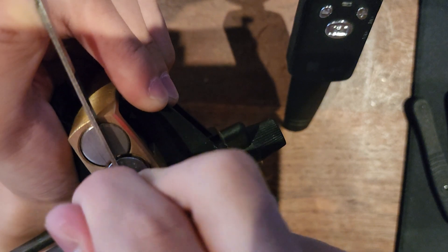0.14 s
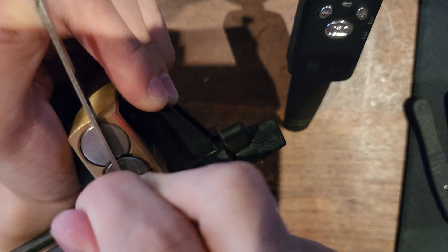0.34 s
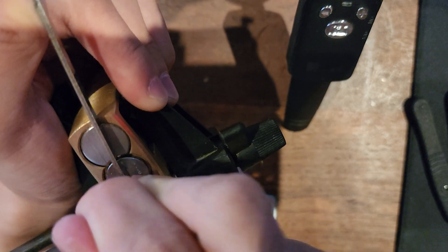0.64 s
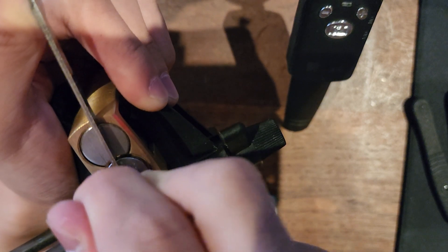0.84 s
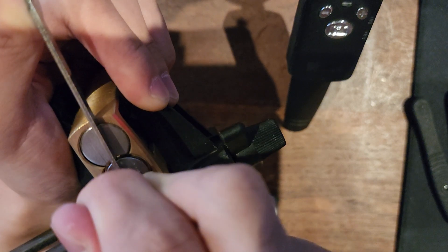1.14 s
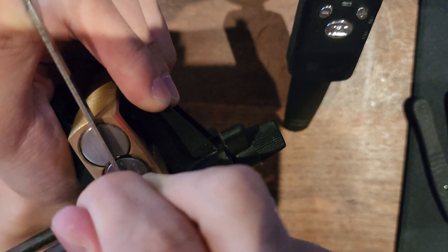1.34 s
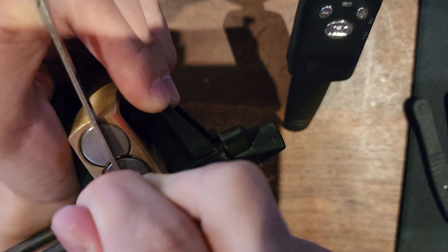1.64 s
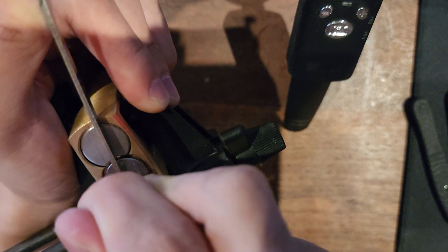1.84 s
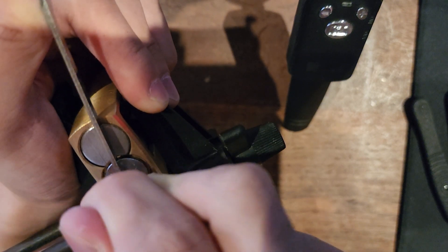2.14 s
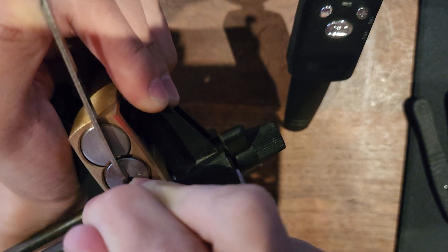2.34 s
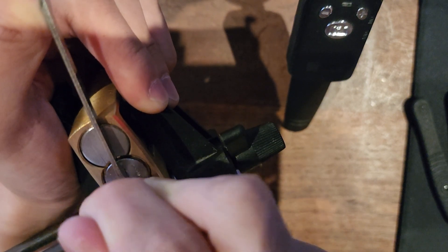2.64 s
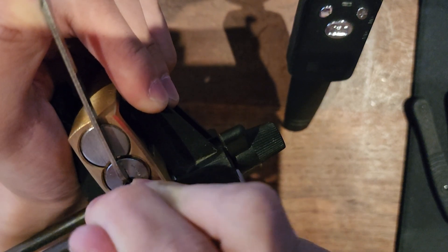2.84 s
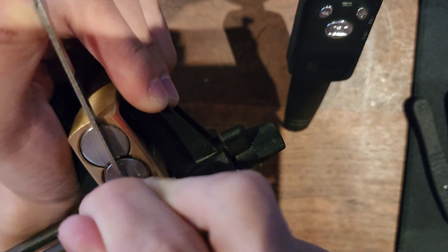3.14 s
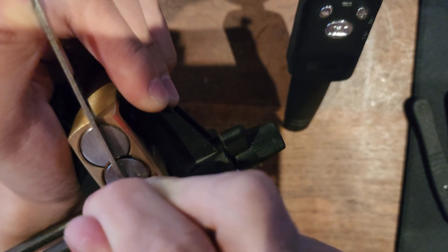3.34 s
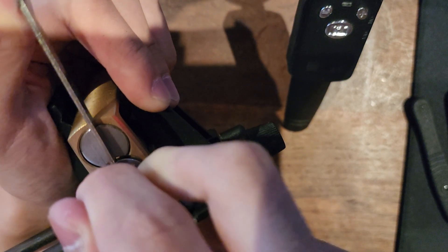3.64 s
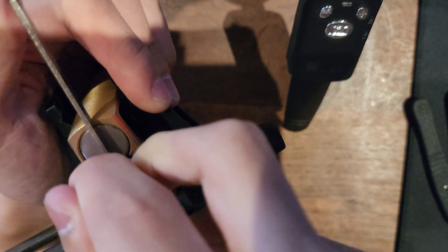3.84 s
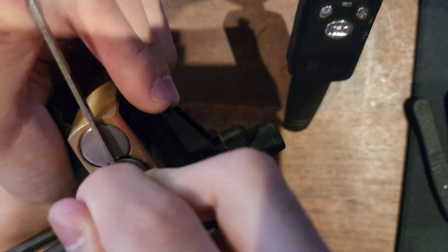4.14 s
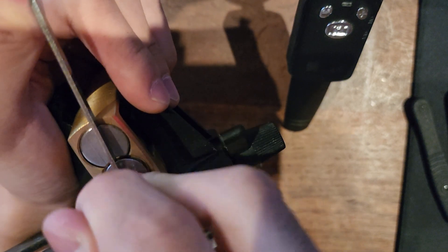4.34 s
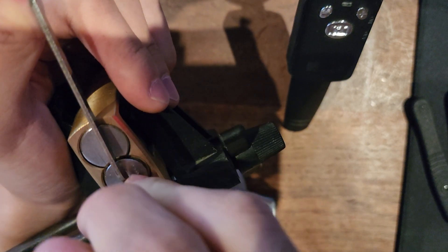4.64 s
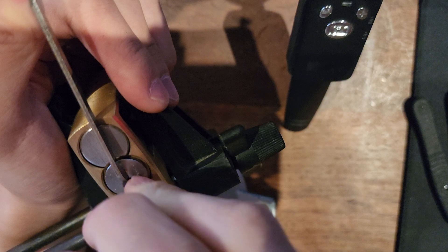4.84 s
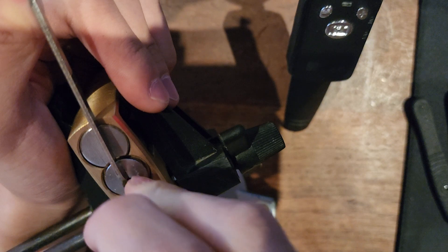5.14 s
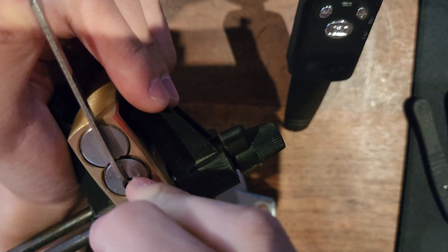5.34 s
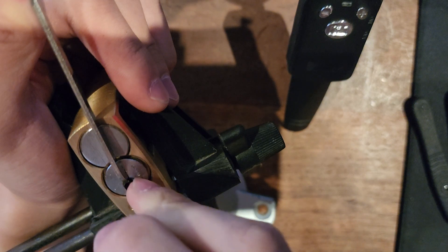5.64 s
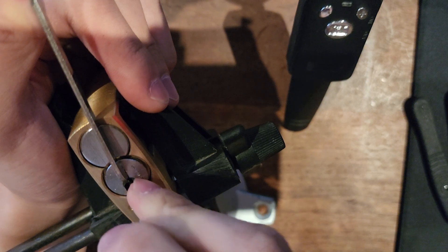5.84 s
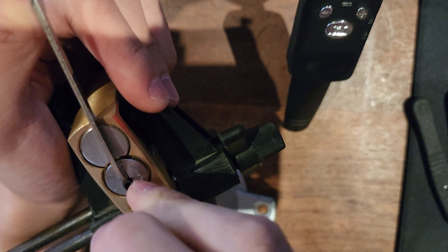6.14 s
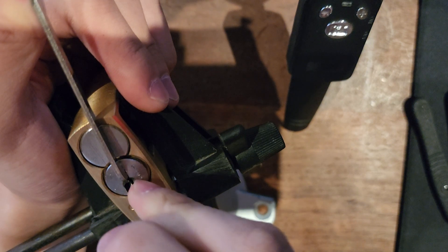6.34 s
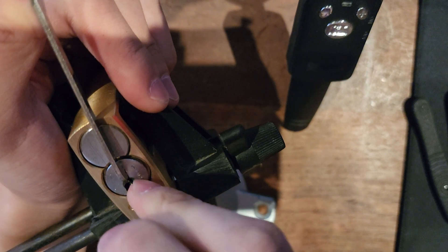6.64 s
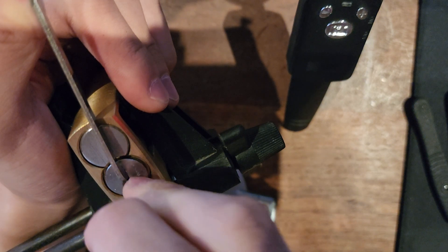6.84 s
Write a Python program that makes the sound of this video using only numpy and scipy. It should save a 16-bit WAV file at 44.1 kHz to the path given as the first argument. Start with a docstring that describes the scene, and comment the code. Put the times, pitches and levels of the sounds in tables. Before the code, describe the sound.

A thin pick clicks and slips against pins inside a clamped metal lock, with sharp snaps and bench thumps over a steady low hum.

```python
"""A pick works a lock held in a vise, near a two-port microphone; appliance hum and air noise throughout.
0.9 s: faint tick. 1.4-1.8 s: hard slips, bench thumps, a short twang. 2.4 s: the hardest slip.
2.6-3.5 s: faint slips, a scrape. 3.6 s: a faint treble hiss swells before a hard cluster, then a pick buzz.
3.8-5.6 s: faint slips and scrapes. 6.0 s: two firmer slips with thumps, then faint ticks to 6.8 s.
Slips are bursts of grit ringing lock modes; jolts ring bench modes; a small room answers with noise tails."""
import sys
import numpy as np
from scipy import signal
from scipy.fft import rfft, irfft, next_fast_len
from scipy.io import wavfile
from scipy.ndimage import uniform_filter1d

SR = 44100
rng = np.random.default_rng(int(sys.argv[2]) if len(sys.argv) > 2 else 0)


def wav_record(signal):
    """Record a signal, one row per channel, as 16-bit PCM in the file named by sys.argv[1]."""
    frames = np.transpose(np.atleast_2d(signal))
    bounded = np.clip(frames, -1, 1)
    # unit amplitude maps onto the largest positive 16-bit level
    quanta = np.round(bounded * 32767).astype(np.int16)
    wavfile.write(sys.argv[1], SR, quanta)


N = 307862

# Motor and mains tones. Each row: frequency in Hz, level in dB rms, waver in dB.
HUM_TONES = [(34, -68, 1), (68.8, -64.5, 1), (119.8, -49, 1.0), (229.8, -60, 2)]
# Air noise spectrum. Each row: frequency in Hz, relative density in dB per Hz.
AIR_SPECTRUM = [(25, -27.5), (50, -12), (80, -9), (100, -3.5), (150, -2.5), (200, -1.5), (290, -2),
                (380, -10.5), (600, -17.5), (1000, -22), (2000, -29), (4000, -45), (8000, -50.5),
                (9200, -57.5)]
# Air noise resonances. Each row: frequency in Hz, width in Hz, boost in dB.
AIR_RESONANCES = [(152.9, 33, 4), (279, 14, 3.5), (322.7, 29, 1), (549, 8.5, 8), (604, 42, 7.5),
                  (913, 180, 5), (1320, 220, 6), (1715, 100, 5.5), (2140, 250, 4.5), (3440, 1000, 6.5),
                  (5640, 300, 5.5), (8000, 1300, 4)]
# Air noise at the two ports. Each row: frequency in Hz, left-right correlation before clipping to +-0.99.
AIR_LIKENESS = [(60, 0.98), (130, 1), (290, 0.54), (640, -0.026), (1410, -0.28), (3100, 0.11),
                (6820, -0.13), (15000, -0.29)]
# Room echoes. Each row: frequency in Hz, level in dB, t60 in seconds.
ROOM_BANDS = [(490, -59, 0.36), (1970, -48.5, 0.41), (4884, -45, 0.27), (10000, -43, 0.31),
              (13500, -40.5, 0.13), (15900, -42, 0.13)]
# Bench and vise modes. Each row: frequency in Hz, relative level in dB, t60 in seconds.
BENCH_MODES = [(97.2, 9, 0.22), (129, -6.5, 0.075), (189, -4.5, 0.32), (262, -8.5, 0.22), (311, -15, 0.4),
               (435, -3, 0.095), (550, -3.5, 0.1), (608, -7, 0.13), (685.5, -28.5, 0.052),
               (855, -5.5, 0.09), (1250, -21, 0.096), (1425, -4.5, 0.24), (1735, -34.5, .1)]
# Dense, noisy knock of the wood. Each row: frequency in Hz, relative level in dB, t60 in seconds.
WOOD_KNOCK = [(262.7, -13, 0.15), (399, -17, 0.18), (584, -4.5, 0.21), (705, -9.5, 0.21), (990, -22, 0.26),
              (1397, -14.5, 0.26), (2000, -13, 0.28)]
# Jolts through the vise. Each row: start in seconds, level in dB, push in ms, deep thump in dB,
# extra damping by the hands in dB per second.
JOLT_EVENTS = [(1.4018, -30.5, 0.69, -5, 146), (1.412, -41.5, 0.32, -7.5, 147),
               (1.749, -37.5, 0.44, -4.5, 299), (2.4167, -29.5, 0.72, 2, 50),
               (2.429, -31.5, 0.59, -3.5, 49), (2.441, -39, 0.75, -10.5, 199), (2.84, -50, 0.56, -2, 33),
               (3.649, -59, 0.26, 2, 28), (3.663, -48.5, 0.17, -15, 33), (4.853, -48.5, 0.5, 2, 65),
               (5.984, -53.5, 1.34, 3.5, 32), (6.048, -58, 0.3, 4, 30), (6.23, -46, 2.9, -3.5, 32)]
# Tension tool springing back. Each row: start in seconds, length in seconds, level in dB,
# start frequency in Hz, top frequency in Hz.
TWANG_EVENTS = [(1.781, 0.036, -59, 865, 920), (1.783, 0.069, -65, 1414, 1610)]
# Resonances of the springy pick. Each row: frequency in Hz, width in Hz, relative level in dB.
PICK_RESONANCES = [(910, 73, 1.5), (1630, 90, 5), (2120, 220, 8.5), (4050, 400, -5), (5600, 220, -4),
                   (5690, 410, 2), (6150, 250, -3.5), (8080, 450, 2), (9100, 300, -2), (9100, 400, -9)]
# Pick buzzing on after a slip. Each row: start in seconds, level in dB, favoured frequency in Hz, t60 in seconds.
BUZZ_EVENTS = [(1.76, -63.5, 5850, 0.22), (2.84, -69, 1700, 0.1), (3.357, -65, 1650, 0.13),
               (3.668, -58.5, 5740, 0.48), (3.668, -70, 8400, 0.23), (3.93, -70, 1630, 0.097),
               (4.45, -75, 9100, 0.12), (4.605, -78, 8140, 0.1), (6.054, -80, 6100, 0.29),
               (6.171, -64.5, 6130, 0.054), (6.378, -65.5, 9900, 0.067)]
# Short pings of one resonance each, mostly within slips and jolts.
# Each row: start in seconds, level in dB, frequency in Hz, t60 in seconds.
PING_EVENTS = [(0.891, -64.5, 6300, .01), (1.402, -34.5, 3370, 0.023), (1.4035, -38, 6000, .01),
               (1.402, -37, 12000, .012), (1.404, -39, 245, 0.066), (1.404, -49, 1450, 0.054),
               (1.745, -51, 1210, 0.024), (1.749, -42, 550, 0.034), (1.752, -44, 302, 0.071),
               (1.772, -57, 1500, .03), (1.768, -53.5, 2050, 0.047), (1.748, -43, 1480, 0.045),
               (1.752, -48, 900, 0.043), (2.418, -21, 14000, .008), (2.424, -44, 1460, 0.065),
               (2.593, -58, 5930, .012), (2.837, -50, 1740, 0.019), (2.849, -52, 1756, 0.022),
               (3.075, -57, 4910, .01), (3.075, -60, 8100, .015), (3.355, -56, 3540, 0.0095),
               (3.495, -58, 7030, .01), (2.4154, -15, 4360, 0.003), (3.6629, -20, 5050, 0.0057),
               (3.664, -45.5, 730, 0.062), (3.925, -53, 4820, 0.0093), (3.9267, -58, 8380, 0.013),
               (3.929, -56, 1660, 0.033), (4.209, -65, 8270, 0.011), (4.4265, -57, 4150, .01),
               (4.359, -45.5, 1260, 0.031), (4.438, -48, 5300, 0.013), (4.4375, -53.5, 8900, 0.02),
               (4.447, -54, 4150, .01), (4.448, -65, 8900, 0.048), (4.532, -67, 5300, .015),
               (4.57, -63, 8100, 0.018), (4.589, -57, 4100, .012), (4.59, -60, 8200, 0.013),
               (4.603, -54, 8160, 0.019), (4.853, -50.5, 4800, .012), (4.86, -56, 7400, .01),
               (4.9, -67, 5300, 0.011), (5.164, -66.5, 4520, .012), (5.9836, -26.5, 4030, 0.0041),
               (5.9855, -39, 2010, 0.015), (6.0499, -26, 4060, 0.003), (6.171, -60, 6340, .012),
               (6.226, -63, 4750, .01), (6.378, -52, 3700, .008), (6.3777, -57, 7560, .01),
               (6.378, -59, 10070, .015), (6.825, -55, 4150, 0.01), (6.828, -59, 9170, .012)]
# Scrapes of the pick over the pins; at 3.605 s a faint treble hiss swelling before the 3.65 s slips.
# Each row: start in seconds, length in seconds, level in dB, band centre in Hz.
SCRAPE_AND_HISS_EVENTS = [(2.832, 0.042, -66.5, 1930), (3.605, 0.12, -59.5, 8050),
                          (3.804, 0.05, -62.5, 3970), (4.408, 0.046, -59, 3510), (4.519, .025, -68.5, 4000),
                          (4.556, 0.054, -63, 3600), (6.156, 0.025, -72.5, 5000)]
# Lock and pins, damped by vise and fingers. Each row: frequency in Hz, relative level in dB, t60 in seconds.
LOCK_MODES = [(1776, 6.5, 0.017), (2346, -3, 0.011), (3060, 1.5, 0.012), (3980, -4.5, 0.01),
              (4225, -4, 0.0065), (4730, -5.5, 0.0077), (5550, -0.5, 0.0057), (7620, 3, 0.0098),
              (7750, -5, 0.011), (8600, -2.5, 0.0068), (9000, -9.5, 0.018), (11520, -12.5, 0.035),
              (12900, -13.5, 0.01), (14020, -7, 0.014)]
# Colour all slips share, from lock body and bench top. Each row: frequency in Hz, gain in dB.
SLIP_COLOUR = [(1000, -1.5), (2000, -5), (2700, -5.5), (3200, -1.5), (4000, -0.5), (4800, -2), (6300, -1.5),
               (7800, 0), (10000, -1.5), (12000, 3), (16000, 4)]
# Slips of the pick. Each row: start in seconds, level in dB, brightness in dB per octave,
# narrowness in dB per octave squared, time to chatter peak in ms, echo send in dB, left over right in dB.
SLIP_EVENTS = [(0.8913, -47, 2, 11, 1.9, -22, 4), (1.4009, -8.5, -3, -0.5, 3.6, -13, 1),
               (1.4041, -7, 3.5, 1, 0.59, -3, 2.5), (1.4059, -15.5, -4, 8, 1.4, -6.5, 9),
               (1.746, -7, 0, 1, 2.7, -9, 4), (2.416, 3.5, 1.5, 1, 0.68, -4, 0),
               (2.419, -9.5, -1.5, 4, 1.1, -2.5, 3), (2.594, -29.5, 1, 4.5, 1.8, 0.5, 3),
               (2.834, -41, -14, 7, 1.9, 5, 9), (3.0747, -31.5, 4.5, 9.5, 2.3, 0.5, 1),
               (3.3545, -25.5, -4.5, 5.5, 2.9, -2, 5), (3.494, -30.5, 8.5, 10, 2.2, 2.5, 1),
               (3.624, -41.5, 3, 13, 1.5, -3, -1), (3.6474, -14, 6, 1, 0.74, -9, -2),
               (3.6492, -6, 2.5, 4, 1, 0.5, 6), (3.663, -0.5, 4.5, 5.5, 2, -18, 0),
               (3.829, -43.5, -7, 8.5, 4, -1, -3), (3.925, -32, -1, 1, 1.5, 2, 1),
               (4.114, -42.5, -4.5, 6.5, 1.2, 1.5, 2), (4.209, -41.5, -3, 0, 1.2, 3, 6),
               (4.4203, -39, -7, 2.5, 1.1, -4.5, 1), (4.4252, -36.5, -9, 2, 1.2, 2, 1),
               (4.438, -31, 0, 2, 1.2, -2.0, 3), (4.447, -33, -7, 5, 1.1, 0, 10),
               (4.531, -41, -9, 3, 2.5, 10, 1), (4.563, -41, -8.5, 7.5, 1.3, -3.5, 0),
               (4.57, -43, -11, -1, 1.6, 5, 7), (4.59, -41, -7, 1, 1.5, 8, 7),
               (4.601, -40, 2.5, -2, 1.8, -1, 8), (4.85, -29, -1.5, 0, 2.7, -1, 7.5),
               (4.8605, -24.5, 2, 12, 1.4, -2.5, 1), (5.164, -42, -5.5, 6.5, 1.1, -8, 0),
               (5.6103, -44.5, -10, 5, 2, -4.5, 4), (5.9828, -18, -8, 4.5, 1.2, -1, 2.5),
               (6.045, -31.5, -5.5, 1, 1.1, 6, 10), (6.0495, -16.5, -6, 6, 1.3, -7, -4),
               (6.171, -40, -7.5, 2, 1.1, 11, 3), (6.226, -29, 1, 10, 1.7, -3, 3),
               (6.376, -27, -2.7, 5.5, 1.3, -1, 1), (6.826, -28.5, -2.5, 8, 2, 1.5, 1)]

AIR_DB, BACKGROUND_PAN_DB = -52.5, 1.42
PORT_HZ, THUMP_TOP_HZ = 67.95, 220
BUZZ_FALL_DB = 31  # one octave from the favoured pitch
PING_SWELL_CYCLES = 1.3
SLIP_HZ, SLIP_LOW_HZ, SLIP_HIGH_HZ = 5600, 1900, 12600
TOP_HZ = 16550


def undb(db):
    """Gain of a level in dB."""
    return 10 ** (np.asarray(db) / 20)


def pan_gains(left_over_right_db):
    """Left and right gains, as a column."""
    return undb(np.array([[left_over_right_db], [-left_over_right_db]]) / 2)


def read(table, hz):
    """Columns of a table at given frequencies, on a log axis."""
    rows = np.transpose(table)
    log_hz = np.log(np.maximum(hz, 1))
    return [np.interp(log_hz, np.log(rows[0]), column) for column in rows[1:]]


def add(out, x, start_s):
    """Mix x into out from start_s on."""
    i = int(start_s * SR)
    out[..., i:i + x.shape[-1]] += x[..., :N - i]


def bandpass(x, low_hz, high_hz, order):
    """Butterworth bandpass."""
    sos = signal.butter(order, [low_hz, high_hz], "bandpass", fs=SR, output="sos")
    return signal.sosfilt(sos, x)


def walk(rate_hz):
    """Random levels held 1 / rate_hz seconds and slewed; spread near 1."""
    hold = int(SR / rate_hz)
    steps = np.repeat(rng.standard_normal(N // hold + 1), hold)
    return uniform_filter1d(steps, hold)[:N]


def rings(modes, seconds):
    """One decaying complex tone a mode."""
    t = np.arange(int(seconds * SR)) / SR
    return np.array([undb(db) * np.exp((2j * np.pi * hz - np.log(1000) / t60_s) * t)
                     for hz, db, t60_s in modes])


def fading(table, centres_hz, seconds):
    """Two unrelated noises in half-octave bands, each band with its own level and decay."""
    t, out = np.arange(int(seconds * SR)) / SR, 0
    settle = SR // 20  # samples dropped while the filter settles
    for hz in centres_hz:
        db, t60_s = read(table, hz)
        noise = rng.standard_normal((2, len(t) + settle))
        band = bandpass(noise, hz / 2 ** .25, hz * 2 ** .25, 2)[:, settle:]
        out = out + undb(db - 60 * t / t60_s) * band / band.std()
    return out


def grit(count, rough):
    """Noise made of uneven tiny contacts, rms 1."""
    contacts, unevenness = rng.standard_normal((2, count))
    x = contacts * np.exp(rough * unevenness)
    return x / x.std()


def lock(spread_db=10.5, snap_db=12.0):
    """A bare snap, then the lock's modes; each port hears its own random mix of them."""
    level_luck, phase_luck = rng.standard_normal((2, 2, len(LOCK_MODES)))
    mix = undb(spread_db * level_luck) * np.exp(3j * phase_luck)
    body = (mix @ rings(LOCK_MODES, .05)).real
    body[:, 0] += undb(snap_db)
    return body / np.sqrt(np.mean(np.sum(body ** 2, 1)))


def background(swell_db=0.4):
    """Swelling air noise, most alike at the ports in the bass, under wavering motor and mains tones."""
    size = next_fast_len(N)
    hz = np.arange(size // 2 + 1) * SR / size
    like = np.clip(read(AIR_LIKENESS, hz)[0], -.99, .99)
    peaks_db = sum(db / (1 + (2 * (hz - f) / width_hz) ** 2) for f, width_hz, db in AIR_RESONANCES)
    mid, side = rfft(rng.standard_normal((2, size))) * undb(read(AIR_SPECTRUM, hz)[0] + peaks_db)
    # mid and side shares set the left-right correlation
    mid, side = mid * np.sqrt(1 + like), side * np.sqrt(1 - like)
    air = irfft(np.array([mid + side, mid - side]), size)[:, :N]
    air *= undb(AIR_DB + swell_db * walk(2.5)) / air.std()
    t, hum = np.arange(N) / SR, 0
    for f, db, waver_db in HUM_TONES:
        level = undb(db + waver_db * walk(3)) * np.sqrt(2)
        hum = hum + level * np.sin(2 * np.pi * f * t + 0.59 * walk(1.8))
    return (air + hum) * pan_gains(BACKGROUND_PAN_DB)


def room(x, gap_ms=1.5):
    """Dense echoes after a short gap, each band fading at its own rate; unrelated at the two ports."""
    tail = fading(ROOM_BANDS, 250 * 2 ** np.arange(0, 6.1, .5), 0.6)
    tail *= np.clip(np.arange(tail.shape[1]) * 1000 / SR / gap_ms - 1, 0, 1)
    return signal.fftconvolve(tail, x[None], axes=1)[:, :N]


def jolts(pan_db=2.0, twist_rad=0.24, rise_ms=7.2):
    """A smooth push rings the bench; higher modes reach the two ports out of step."""
    out, tones = np.zeros((2, N)), rings(BENCH_MODES, .4)
    order = np.arange(len(BENCH_MODES))
    turn_rad, sign = twist_rad * order / 2, (-1) ** order
    # the heavy lowest mode takes a moment to build up
    tones[0] *= 1 - np.exp(-np.arange(tones.shape[1]) * 1000 / SR / rise_ms)
    deep = np.array(BENCH_MODES)[:, 0] < THUMP_TOP_HZ
    for start_s, db, push_ms, thump_db, damp_db_per_s in JOLT_EVENTS:
        mix = sign * undb(thump_db * deep)
        body = np.array([(mix * np.exp(1j * side * turn_rad) @ tones).imag for side in (1, -1)])
        wood = body + fading(WOOD_KNOCK, 250 * 2 ** np.arange(0, 3.1, .25), .4)
        wood = wood * undb(-damp_db_per_s * np.arange(wood.shape[1]) / SR)
        push = np.hanning(int(push_ms * SR / 1000) + 3)
        thump = signal.fftconvolve(wood, push[None] / push.sum(), axes=1)
        add(out, undb(db) * pan_gains(pan_db) * thump, start_s)
    return signal.sosfilt(signal.butter(2, PORT_HZ, "highpass", fs=SR, output="sos"), out)


def twangs(waver_db=4, pitch_waver=.015, top_fraction=0.6):
    """The tension tool springs back: soft, unsteady tones swell, bend up, sag a little and fade."""
    out, uneven = np.zeros((2, N)), undb(waver_db * walk(80))
    drift = 1 + pitch_waver * walk(120)
    for start_s, seconds, db, start_hz, top_hz in TWANG_EVENTS:
        count = int(seconds * SR)
        bend = (np.linspace(0, 1, count) / top_fraction - 1) ** 2
        hz = top_hz + (start_hz - top_hz) * bend
        phase = 2 * np.pi * np.cumsum(hz * drift[int(start_s * SR):][:count]) / SR
        add(out, undb(db) * np.sqrt(np.hanning(count)) * np.sin(phase), start_s)
    return out * uneven


def buzzes(rattle_db=3.5):
    """Fading noise in the pick's narrow resonances, favouring those near the given pitch."""
    out, t = np.zeros((2, N)), np.arange(SR // 2) / SR
    onset = np.clip(t * 1000, 0, 1)  # 1 ms
    uneven = undb(rattle_db * walk(70))
    for start_s, db, near_hz, t60_s in BUZZ_EVENTS:
        for hz, width_hz, mode_db in PICK_RESONANCES:
            noise = rng.standard_normal((2, len(t)))
            ring = bandpass(noise, hz - width_hz / 2, hz + width_hz / 2, 1)
            share_db = mode_db - BUZZ_FALL_DB * np.log2(hz / near_hz) ** 2
            envelope = undb(db + share_db - 60 * t / t60_s) * onset
            add(out, envelope * ring / ring.std(), start_s)
    return out * uneven


def pings():
    """Short pings of one damped resonance each, swelling over a cycle or two."""
    out = np.zeros((2, N))
    for start_s, db, hz, t60_s in PING_EVENTS:
        swell = np.clip(np.arange(SR // 10) / SR * hz / PING_SWELL_CYCLES, 0, 1)
        add(out, swell * rings([(hz, db, t60_s)], .1).imag, start_s)
    return out


def scrapes_and_hiss(rough=1.0, pan_db=9.5):
    """Dense bandpassed grains swell and fade, ringing the lock only a little."""
    out = np.zeros((2, N))
    for start_s, seconds, db, hz in SCRAPE_AND_HISS_EVENTS:
        count = int(seconds * SR)
        grains = bandpass(np.hanning(count) * grit(count, rough), hz / 2, hz * 2, 2)
        # in a scrape the pressed pick damps the lock: weaker modes against the snap
        rung = signal.fftconvolve(lock(spread_db=5.5, snap_db=21.5), grains[None], axes=1)
        add(out, undb(db) * pan_gains(pan_db) * rung, start_s)
    return out


def slips(rough=0.46, bass_db=4.0, even_hz=1110.0, lag_ms=0.303, shadow_db=5.5, ringing=0.25):
    """Short gritty bursts ring the lock; returns what reaches the ports and what the walls receive."""
    near, far, size = np.zeros((2, N)), np.zeros(N), 4096
    t, hz = np.arange(size) / SR, np.arange(size // 2 + 1) * SR / size
    lead_s = 128 / SR  # room for the filter's onset
    fade = np.clip(np.minimum(2 - 3 * t * SR / size, t / lead_s), 0, 1) ** 2
    # equal energy per octave, thinned in the bass
    spread = np.sqrt(SLIP_HZ / np.maximum(hz, 1)) * np.exp(-2j * np.pi * hz * lead_s)
    thinning_db = bass_db * np.log2(np.clip(hz / SLIP_LOW_HZ, 1 / 3, 1))
    spread = spread * undb(read(SLIP_COLOUR, hz)[0] + thinning_db)
    octaves = np.log2(np.clip(hz, SLIP_LOW_HZ, SLIP_HIGH_HZ) / SLIP_HZ)
    # the right port is further off and shaded in the treble
    right = undb(-shadow_db * (hz / 12000) ** 2) * np.exp(-2j * np.pi * hz * lag_ms / 1000)
    ports = np.array([np.ones(len(hz)), right])
    for start_s, db, bright_db, narrow_db, chatter_ms, echo_db, pan_db in SLIP_EVENTS:
        u = t[:size // 4] * 1000 / chatter_ms
        chatter = u ** 2 * np.exp(-2 * u) * grit(len(u), rough)
        modes = rfft(lock(), size)
        burst = modes * rfft(chatter, size)
        # flatten the broad spectrum: chance and modes shape only its fine detail
        burst /= np.sqrt(uniform_filter1d(np.abs(burst) ** 2, int(even_hz * size / SR), axis=1))
        colour = spread * undb(db + bright_db * octaves - narrow_db * octaves ** 2)
        direct = fade * irfft(ports * burst * colour, size)
        add(near, direct * pan_gains(pan_db), start_s - lead_s)
        to_walls = fade * irfft(np.abs(modes[0]) ** ringing * colour, size)
        add(far, to_walls * undb(echo_db), start_s - lead_s)
    return near, far


def scene(ping_echo_db=-16):
    """Background, bench, pick and lock, with echoes of slips, scrapes, hiss, jolts and pings."""
    clicks, far = slips()
    rest, tones = scrapes_and_hiss() + jolts(), pings()
    echoes = room(far + rest.mean(0) + undb(ping_echo_db) * tones[0])
    return background() + echoes + rest + twangs() + buzzes() + tones + clicks


def record(dry):
    """The recorder cuts the top: steep elliptic lowpass."""
    return signal.sosfilt(signal.ellip(12, .2, 70, TOP_HZ, fs=SR, output="sos"), dry)


dry = scene()
out = record(dry)
wav_record(out)
```